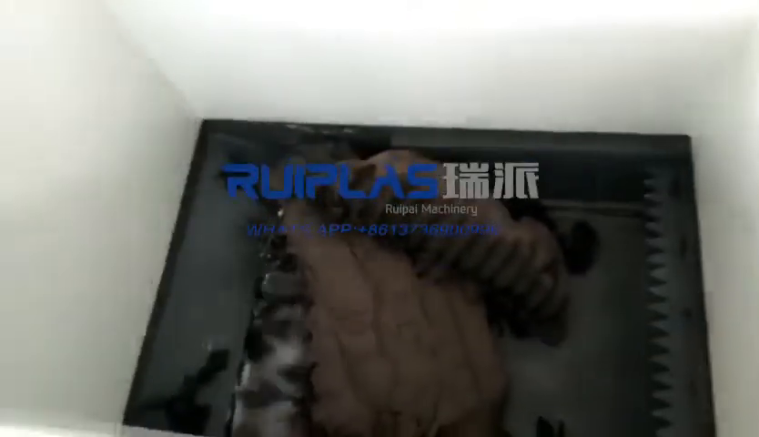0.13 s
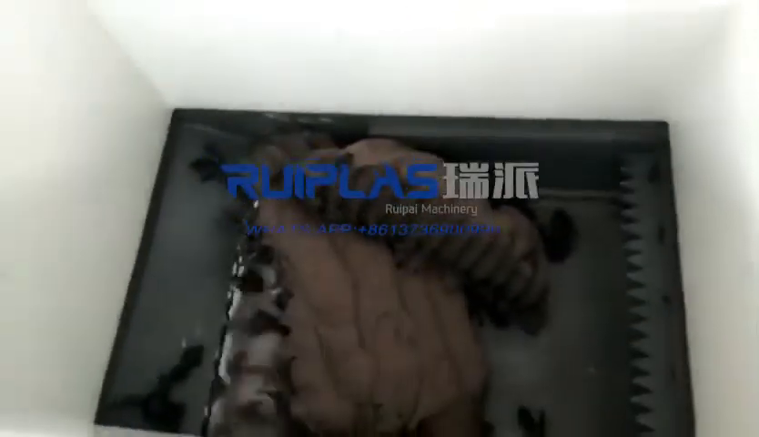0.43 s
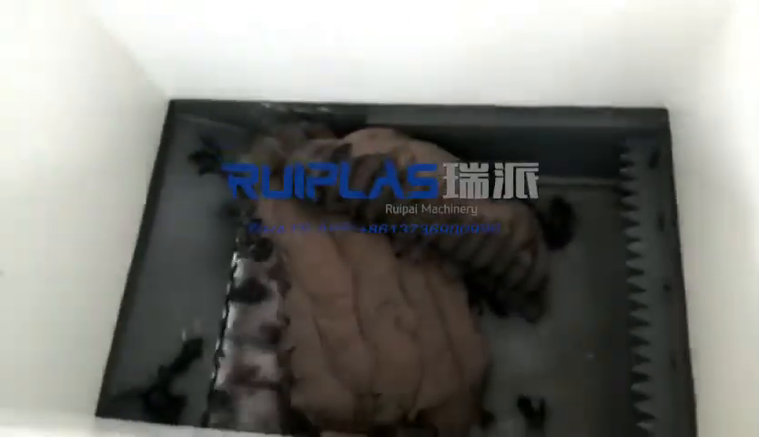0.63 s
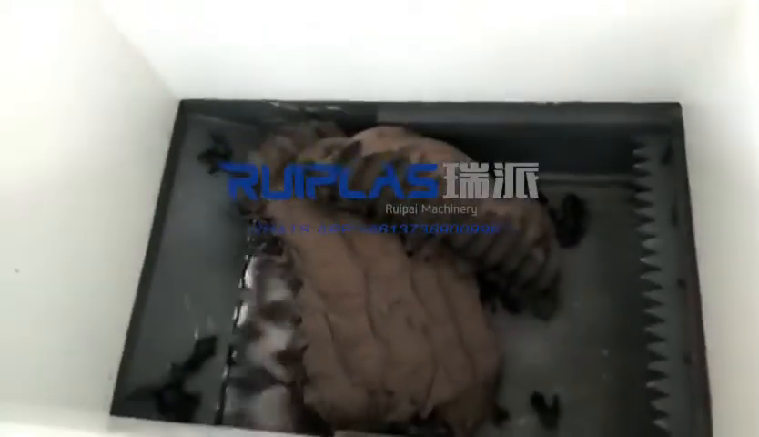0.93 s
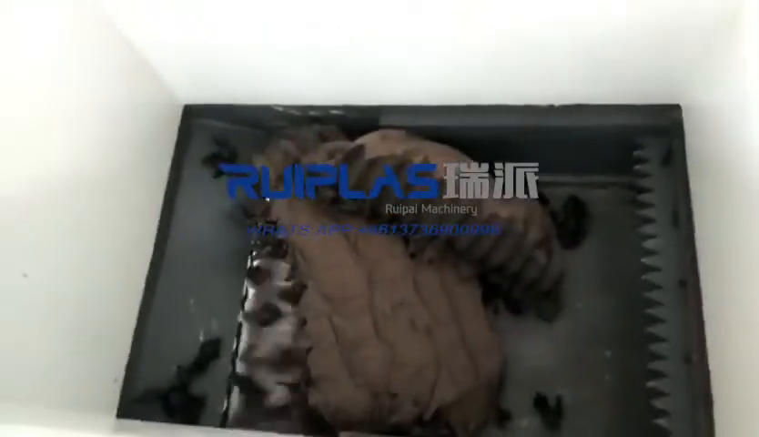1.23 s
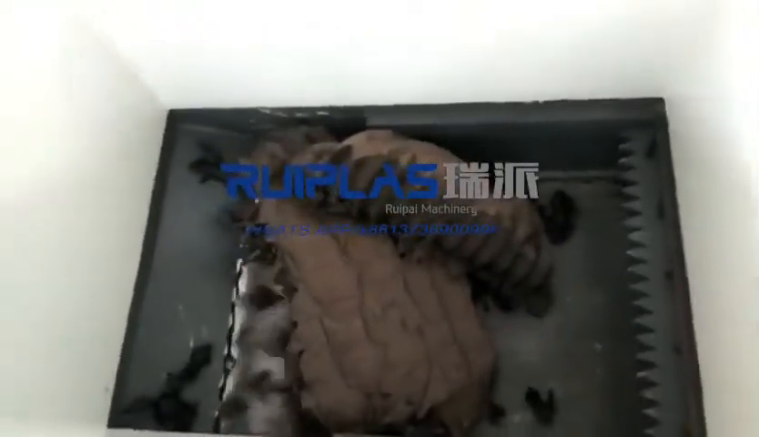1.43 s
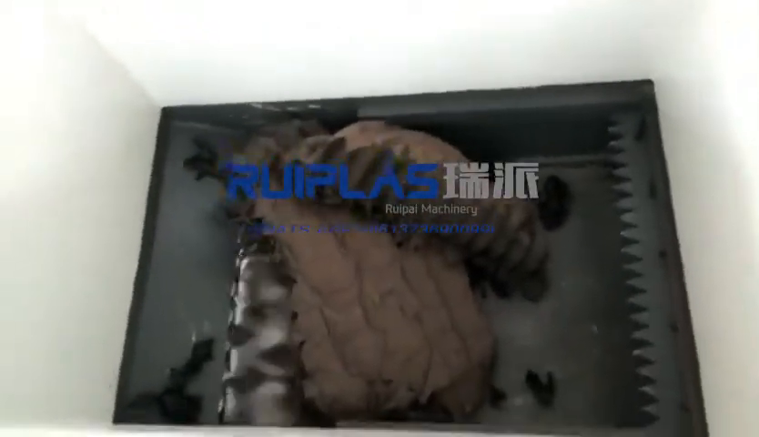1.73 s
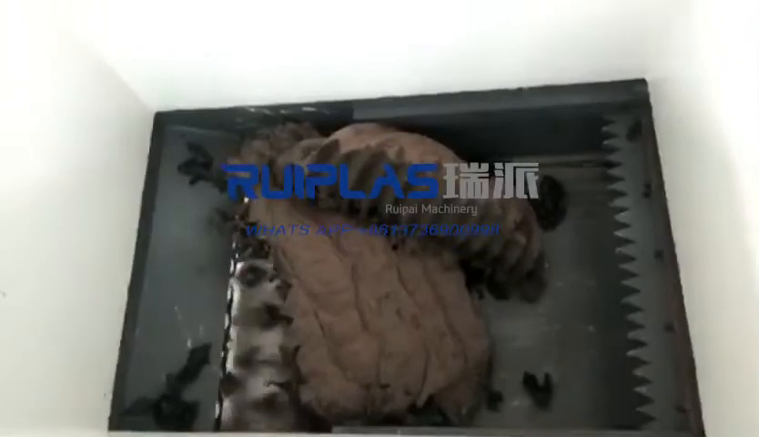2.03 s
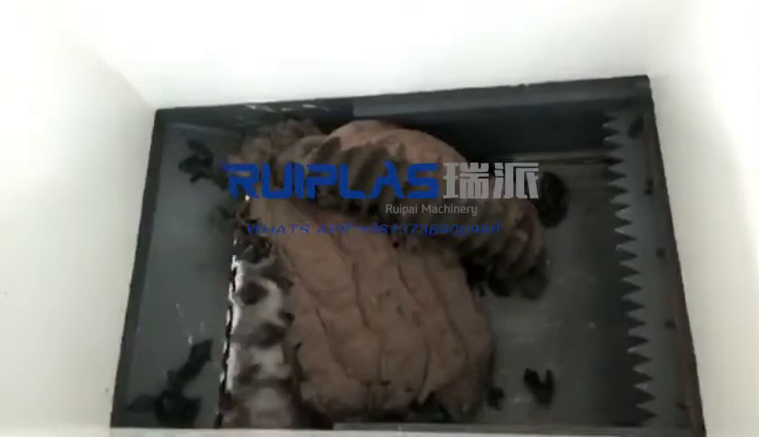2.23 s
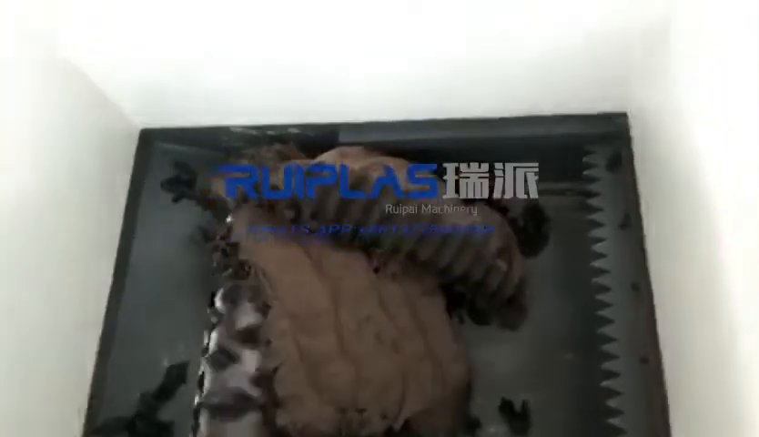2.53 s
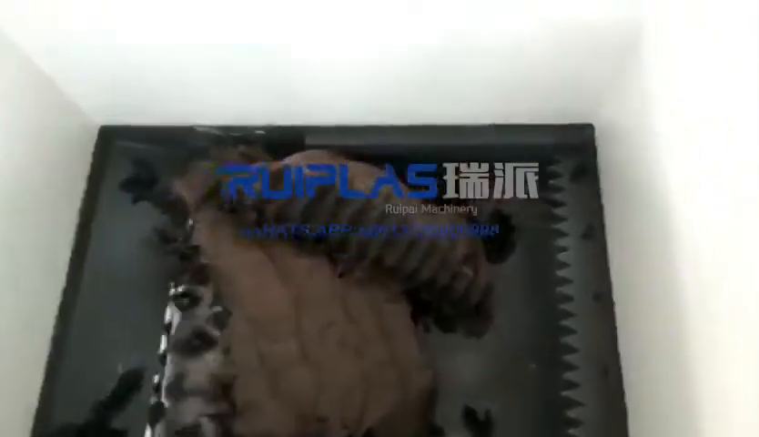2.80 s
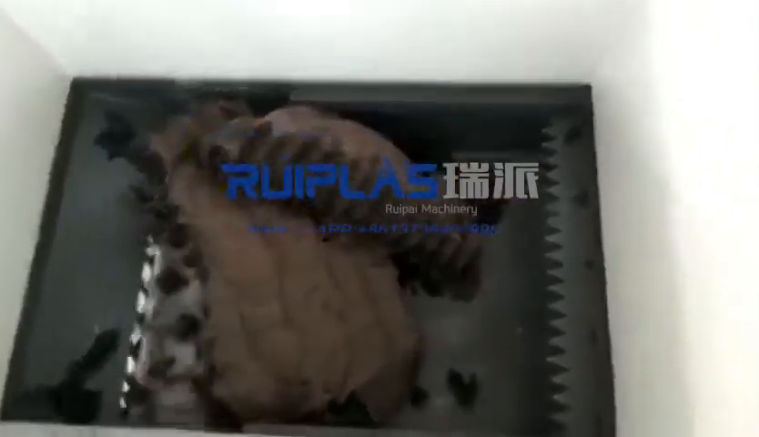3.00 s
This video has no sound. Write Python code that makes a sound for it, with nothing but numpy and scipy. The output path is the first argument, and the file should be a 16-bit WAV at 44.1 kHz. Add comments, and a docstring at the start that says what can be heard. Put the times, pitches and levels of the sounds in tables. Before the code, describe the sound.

An industrial shredder runs throughout, its low drive hum under a dense steel roar; teeth crunch rapidly into a plastic lump that groans, chips snapping and pieces clacking, heard close above the hopper in a hall.

```python
"""A single-shaft shredder chews a big lump of plastic, heard from above its steel hopper.
From the start the drive hums and rumbles, and the teeth bite about thirteen times a second: filtered random
clicks crunch and rasp, and knocks ring the housing. The lump chatters as a wavering low tone and soon creaks
in rough glides. From half a second on, chips snap off as bright noise bursts, then hard pieces clack on the
steel and the lump thumps the frame. The cutting sounds echo in the hall."""
import sys
import numpy as np
from scipy import signal
from scipy.fft import rfft, irfft, next_fast_len
from scipy.io import wavfile
from scipy.ndimage import uniform_filter1d, minimum_filter1d

SR = 44100
rng = np.random.default_rng(int(sys.argv[2]) if len(sys.argv) > 2 else 0)


def dump(signal):
    """Clip the signal to [-1, 1] and save it as 16-bit WAV at the path in sys.argv[1]."""
    limited = np.clip(np.atleast_2d(signal).T, -1, 1)
    pcm = np.round(limited * 32767).astype(np.int16)
    wavfile.write(sys.argv[1], SR, pcm)


N = 139356
T = np.arange(N) / SR

# All levels are relative: the layer gains below and the filters also act on them.
# hums of the drive: [pitch_hz, level_db, unsteadiness 0-1]
DRIVE_HUMS = [(76.5, -31, 0.6), (90.85, -30.5, 0.7), (104, -39, 1), (224, -36, 1), (401.8, -32, 0.92),
              (708, -39, 1)]
# colour of the frame's rumble: [frequency_hz, density_db_per_hz]
RUMBLE_COLOUR = [(25, -3.5), (42, -25.5), (58, -1), (72, 4.5), (92, 1.5), (108, -1.5), (150, -5),
                 (300, -30.5)]
RUMBLE_DB = -28.5

# grinding under the load on the rotor: [start_s, roar_level_db, rasp_level_db]
ROTOR_LOAD = [(0, -20, -15), (.1, -21.5, -21.5), (.5, -18.5, -24), (.65, -24, -20), (.9, -20.5, -25),
              (1.2, -20, -21), (1.44, -22, -23), (1.83, -17, -23.5), (2.2, -19.5, -19.5),
              (2.45, -22, -19.5), (2.7, -17, -22.5), (2.9, -18.5, -17), (3.16, -22, -16.5)]
# a tooth bites: [start_s, crunch_level_db, knock_level_db, length_s]
TOOTH_BITES = [(0.0094, -16, -15.5, 0.045), (0.049, -17.5, -25.5, 0.0063), (0.255, -15, -24.5, 0.029),
               (0.328, -19, -14.5, 0.014), (0.428, -17, -18.5, 0.0079), (0.502, -14, -19.5, 0.013),
               (0.535, -14.5, -30.5, 0.011), (0.654, -18.5, -17, 0.021), (0.682, -17.5, -35, 0.026),
               (0.793, -15.5, -17, 0.037), (0.876, -19.5, -18, 0.078), (0.924, -19.5, -18.5, 0.055),
               (1.105, -14.5, -17, 0.038), (1.191, -18, -10, 0.046), (1.261, -11.5, -9.5, 0.01),
               (1.387, -21, -18, 0.015), (1.456, -21, -9, 0.0071), (1.5395, -10, -17, 0.0087),
               (1.607, -13, -12.5, 0.0074), (1.627, -17, -12.5, 0.032), (1.678, -15.5, -18, 0.025),
               (1.743, -15.5, -29.5, 0.034), (1.841, -17.5, -11, 0.028), (1.9096, -16, -33, 0.032),
               (1.994, -16.5, -15, 0.056), (2.089, -17, -13, 0.019), (2.245, -16, -17, 0.049),
               (2.3114, -12, -13, 0.039), (2.403, -19, -9, 0.014), (2.471, -16, -15, 0.1),
               (2.54, -15, -15, 0.017), (2.602, -11.5, -29, 0.0087), (2.651, -20, -19, 0.016),
               (2.699, -15.5, -15.5, 0.047), (2.789, -9.5, -11.5, 0.017), (2.85, -12.5, -15, 0.028),
               (2.946, -22, -18.5, 0.019), (2.992, -16.5, -8.5, 0.019), (3.037, -17.5, -10, 0.016),
               (3.098, -19, -10.5, 0.0071)]
BITE_ATTACK_S, BITE_RELEASE_S = 0.009, 0.021

# resonances of housing and hopper: [pitch_hz, width_hz, level_db]
HOUSING_MODES = [(216.5, 23, 0), (299.2, 15, 3), (324.4, 14, 1), (372.8, 4.4, -4.5), (403, 3.4, -1.5),
                 (491, 22, -5.5), (625.8, 19.8, 2), (712.6, 17, -1), (806, 42, -2.5), (883, 27, -5),
                 (942, 15, -8), (1234, 28, -1), (1570, 51, -2), (1730, 48, -2.5), (1996, 31, -8.5),
                 (2090, 28, -5.5), (2326, 13, -18), (2577, 60, -12)]
# colour of the grinding's broad roar: [frequency_hz, density_db_per_hz]
ROAR_COLOUR = [(110, -7.5), (155, -0.5), (255, -9), (450, 2.5), (750, -3), (900, -1), (1000, -10)]
HOUSING_DB, ROAR_DB, GRIND_DB, KNOCK_DB = -19, -5.5, 0, -10
IMPACTS_PER_S, IMPACT_SPREAD_DB = 2500, 2.5

# colour of the teeth rasping in the plastic: [frequency_hz, density_db_per_hz]
RASP_COLOUR = [(950, -0.5), (1150, 2.5), (1400, -3), (1700, -2.5), (2150, -2), (2350, -6), (2650, -8.5),
               (3000, -14)]
RASP_DB, RASP_BITE_DB, RASP_PATCHY_DB, RASP_JUDDER_DB = -7.5, -14.5, 2.5, 1.5

# colour of the tearing plastic: [frequency_hz, density_db_per_hz]
CRUNCH_COLOUR = [(1500, 3.5), (2600, -1), (3300, -2.5), (4500, 0), (6000, 1), (7400, -1)]
CRUNCH_DB, SCRAPE_DB, CRUNCH_PATCHY_DB, CRUNCH_FLUTTER_DB = -12, -15.5, 2.5, 2
CRACKS_PER_S_PER_BAND, CRACK_SPREAD_DB = 3000, 2.5

# splinters ring for a moment; larger shreds tap the hopper (rates are totals)
SPLINTERS_PER_S, SPLINTER_WIDTH_HZ, SPLINTER_DB = 470, 27, -17
SHREDS_PER_S, SHRED_WIDTH_HZ, SHRED_DB = 120, 14, -16.5

# strength of the lump's chatter: [start_s, level_db]
GROAN_LEVEL = [(0, -29), (.17, -17), (.22, -32), (.33, -10.5), (.39, -7), (.47, -13.5), (.68, -14.5),
               (.8, -31), (.94, -17), (1.05, -32), (1.14, -17), (1.23, -12), (1.3, -18.5), (1.42, -20),
               (1.7, -27.5), (1.76, -18.5), (1.83, -18.5), (1.99, -20), (2.06, -9.5), (2.1, -22.5),
               (2.2, -13.5), (2.25, -20), (2.33, -18.5), (2.39, -23), (2.5, -28), (2.57, -14),
               (2.635, -26.5), (2.68, -19.5), (2.79, -17), (2.85, -11), (2.93, -27), (2.965, -12),
               (3.01, -10.5), (3.06, -20.5), (3.16, -23)]
# its pitch and how unevenly it slips: [start_s, pitch_hz, roughness 0-1]
GROAN_SLIP = [(0, 349, .2), (.19, 360, 0.42), (.26, 353, 0), (.4, 351.5, 0.25), (.72, 353, 0.42),
              (.9, 356, 0.5), (1.2, 353, 0), (1.28, 360, 0.37), (1.42, 350, 0.8), (1.79, 364, 0.07),
              (1.9, 358, 0.6), (1.99, 346, 0.56), (2.08, 362, 0.46), (2.24, 348, 0.6), (2.4, 360, 0.6),
              (2.6, 361, 0.3), (2.75, 354, 0.6), (2.86, 361, 0.3), (3, 356, 0.3), (3.16, 359, 0.54)]
# overtones of the chatter: [multiple_of_pitch, level_db]
GROAN_OVERTONES = [(2, -22.5), (3, -42.5)]
SLIP_WANDER_HZ, OVERTONE_WANDER_HZ = 25.6, 19

# the lump creaks as it shifts: [start_s, length_s, start_pitch_hz, end_pitch_hz, level_db]
LUMP_CREAKS = [(0.034, 0.13, 700, 467, -23.5), (0.189, 0.18, 599.6, 789, -23.5),
               (1.054, .15, 639.7, 458, -23)]
CREAK_ROUGHNESS, CREAK_WANDER_HZ = 0.88, 97   # roughness 0-1

# a chip snaps off: [start_s, ring_level_db, ring_pitch_hz, crack_level_db]
CHIP_SNAPS = [(0.5598, -27, 6370, -13.5), (0.9621, -20.5, 5940, -12), (1.117, -23, 6940, -16.5),
              (1.919, -23, 6570, -21), (2.274, -11.5, 5880, -14), (2.4827, -18, 8000, -8)]
# colour of the snap's crack: [frequency_hz, density_db_per_hz]
SNAP_COLOUR = [(1500, -4), (2350, 6.5), (2750, 4), (3600, -1), (6000, 6.5), (7400, 2)]
SNAP_ATTACK_S, SNAP_DECAY_S, SNAP_WIDTH_HZ = 0.0023, 0.0049, 510

# a hard piece clacks against the steel: [start_s, level_db, centre_hz]
STEEL_CLACKS = [(0.821, -17.5, 1470), (1.463, -29, 1480), (1.689, -19.5, 1100), (1.855, -16.5, 1150),
                (2.018, -18, 1090), (2.254, -14.5, 1050), (2.647, -16.5, 1400), (2.856, -14, 1600)]
CLACK_DECAY_S, CLACK_WIDTH_HZ, CLACK_TOP_HZ, CLACK_RING_DB = 0.0098, 580, 2904, -6

# the lump drops back and thumps the frame: [start_s, level_db]
FRAME_THUMPS = [(0.934, -15), (1.92, -30), (2.689, -18)]
# colour of the thump: [frequency_hz, density_db_per_hz]
THUMP_COLOUR = [(30, -8.5), (60, -4), (88, 3.5), (125, -14.5), (190, -3), (300, -10)]
THUMP_ATTACK_S, THUMP_DECAY_S = 0.029, 0.1

HALL_T60_S, HALL_DB = 0.32, -7
BED_LOW_PASS_HZ = 7550   # steep low-pass on everything but the snaps, and on the snaps' crack
CUTOFF_HZ = 8600


def from_db(db):
    """Decibels to gain."""
    return 10 ** (np.asarray(db) / 20)


def rms_one(x):
    """Scale to unit power."""
    return x / np.sqrt(np.mean(np.abs(x) ** 2) + 1e-20)


def in_time(rows):
    """Each column of a curve, drawn sample by sample."""
    s, *columns = np.transpose(rows)
    return [np.interp(T, s, c) for c in columns]


def drift(rate_hz):
    """Random wander of unit spread: low-passed noise, drawn at every 40th sample and joined by lines."""
    r = np.exp(-80 * np.pi * rate_hz / SR)
    noise = rng.standard_normal(N // 40 + 2002)
    slow = signal.lfilter([1], [1, -2 * r, r * r], noise)[2000:]   # the filter has settled by here
    return np.interp(np.arange(N) / 40, np.arange(len(slow)), rms_one(slow))


def resonate(x, hz, width_hz):
    """One resonance that keeps the power of white input."""
    r = np.exp(-np.pi * width_hz / SR)
    feed = np.sqrt((1 - r * r) / 2) * np.array([1, 0, -1])
    feedback = [1, -2 * r * np.cos(2 * np.pi * hz / SR), r * r]
    return signal.lfilter(feed, feedback, x + 1e-18)


def colour(x, spectrum):
    """Minimum-phase filter with the given spectrum, falling away past its ends; keeps white power."""
    hz, db = np.transpose(spectrum)
    size = 2 * next_fast_len(N)
    octave = np.log2(np.maximum(np.arange(size // 2 + 1) * SR / size, 1))
    points = np.log2(hz)
    outside = np.abs(octave - np.clip(octave, points[0], points[-1]))
    magnitude = rms_one(from_db(np.interp(octave, points, db) - 18 * outside))   # 18 dB per octave
    # folding the cepstrum forward makes the filter causal
    cepstrum = irfft(np.log(magnitude))
    cepstrum[1:size // 2] *= 2
    cepstrum[size // 2 + 1:] = 0
    return irfft(rfft(x, size) * np.exp(rfft(cepstrum)))[:N]


def low_pass(x, hz):
    """A steep cut of the top."""
    return signal.sosfilt(signal.ellip(10, .3, 70, hz, fs=SR, output="sos"), x + 1e-18)


def clicks(per_s, spread_db):
    """Random clicks of uneven size and either sign, unit power."""
    excess = np.minimum(rng.exponential(1, N), 5)
    sizes = from_db(spread_db * excess) * rng.choice([-1, 1], N)
    return rms_one(sizes * (rng.random(N) < per_s / SR))


def cracks(low_hz, high_hz, per_s, spread_db, patchy_db, rate, count):
    """Random cracks of shifting colour: each band has its own clicks and swells and fades alone."""
    edges, out = np.geomspace(low_hz, high_hz, count + 1), 0
    for band in zip(edges, edges[1:]):
        sos = signal.butter(2, band, "band", fs=SR, output="sos")
        swell = from_db(patchy_db * drift(rate))
        out = out + swell * signal.sosfilt(sos, clicks(per_s, spread_db) + 1e-18)
    return out


def wavering(phase, rough, rate):
    """A tone of unit power, of which a share wanders in strength and phase."""
    rough = np.clip(rough, 0, 1)
    steady = np.sqrt(2 * (1 - rough ** 2)) * np.sin(phase)
    wander = drift(rate) * np.sin(phase) + drift(rate) * np.cos(phase)
    return steady + rough * wander


def drive():
    """The drive's unsteady hums, each wavering on its own, over noise for the rumble of the frame."""
    hum = sum(from_db(db) * wavering(2 * np.pi * hz * T, rough, rate=3.2) for hz, db, rough in DRIVE_HUMS)
    return hum + from_db(RUMBLE_DB) * colour(rng.standard_normal(N), RUMBLE_COLOUR)


def bite_forces():
    """Each bite swells, holds while the tooth cuts, and lets go: strength of crunch and of knock."""
    crunch_power, knock_power = 0, 0
    for s, crunch_db, knock_db, length in TOOTH_BITES:
        rise = (1 + np.tanh(2 * (T - s) / BITE_ATTACK_S)) / 2
        shape = rise * np.exp(-np.maximum(T - s - length, 0) / BITE_RELEASE_S)
        crunch_power = crunch_power + (from_db(crunch_db) * shape) ** 2
        knock_power = knock_power + (from_db(knock_db) * shape) ** 2
    return np.sqrt(crunch_power), np.sqrt(knock_power)


def housing(load, knock):
    """Dense impacts, harder at each bite, set the steel roaring and ringing."""
    force = np.hypot(from_db(GRIND_DB) * load, from_db(KNOCK_DB) * knock)
    roar = colour(force * clicks(IMPACTS_PER_S, IMPACT_SPREAD_DB), ROAR_COLOUR)
    push, rings = rms_one(force), 0
    for hz, width, db in HOUSING_MODES:
        impacts = push * clicks(IMPACTS_PER_S, IMPACT_SPREAD_DB)
        rings = rings + from_db(db) * resonate(impacts, hz, width)
    return from_db(ROAR_DB) * roar + from_db(HOUSING_DB) * rms_one(rings)


def rasp(load, knock):
    """The teeth gouge the plastic: coarse cracks under a juddering force that follows load and knock."""
    judder = rms_one(from_db(RASP_JUDDER_DB * drift(67)))
    force = np.hypot(from_db(RASP_DB) * load, from_db(RASP_BITE_DB) * knock) * judder
    grit = cracks(900, 3416, 700, 3.3, patchy_db=RASP_PATCHY_DB, rate=18, count=8)
    return colour(force * grit, RASP_COLOUR)


def tearing(load, crunch):
    """Tiny cracks of tearing plastic grow louder in each bite, over a scrape that follows the load."""
    flutter = from_db(CRUNCH_DB + CRUNCH_FLUTTER_DB * drift(98))
    force = np.hypot(from_db(SCRAPE_DB) * load, flutter * crunch)
    grit = cracks(1426, 9270, CRACKS_PER_S_PER_BAND, CRACK_SPREAD_DB,
                  patchy_db=CRUNCH_PATCHY_DB, rate=38, count=12)
    return colour(force * grit, CRUNCH_COLOUR)


def splinters(crunch, count):
    """Splinters ping through narrow resonances at random pitches, louder in a hard bite."""
    pings = 0
    for hz in rng.uniform(2300, 7400, count):
        breaks = crunch * clicks(SPLINTERS_PER_S / count, spread_db=3.0)
        pings = pings + resonate(breaks, hz, SPLINTER_WIDTH_HZ)
    return from_db(SPLINTER_DB) * pings / np.sqrt(count)


def shreds(knock, count):
    """Larger shreds tap the hopper, louder with each knock, in brief notes at random pitches."""
    taps = 0
    for hz in rng.uniform(1150, 2400, count):
        hits = knock * clicks(SHREDS_PER_S / count, spread_db=0.5)
        taps = taps + resonate(hits, hz, SHRED_WIDTH_HZ)
    return from_db(SHRED_DB) * taps / np.sqrt(count)


def groan():
    """The lump sticks and slips on the rotor: a gliding tone with overtones, rough where it slips unevenly."""
    (db,), (hz, rough) = in_time(GROAN_LEVEL), in_time(GROAN_SLIP)
    phase = 2 * np.pi * np.cumsum(hz) / SR
    tone = wavering(phase, rough, SLIP_WANDER_HZ)
    for multiple, level_db in GROAN_OVERTONES:
        tone = tone + from_db(level_db) * wavering(multiple * phase, rough, OVERTONE_WANDER_HZ)
    return from_db(db) * tone


def creaks():
    """The lump shifts on the steel with a rough, gliding moan."""
    out = 0
    for s, length, start_hz, end_hz, db in LUMP_CREAKS:
        along = np.clip((T - s) / length, 0, 1)
        phase = 2 * np.pi * np.cumsum(start_hz + (end_hz - start_hz) * along) / SR
        swell = np.sqrt(4 * along * (1 - along))
        out = out + from_db(db) * swell * wavering(phase, CREAK_ROUGHNESS, CREAK_WANDER_HZ)
    return out


def snaps():
    """A chip breaks away: one noise burst feeds a short crack and a bright, narrow ring."""
    out = 0
    for s, ring_db, hz, crack_db in CHIP_SNAPS:
        shape = np.clip((T - s) / SNAP_ATTACK_S, 0, 1) * np.exp(-np.abs(T - s) / SNAP_DECAY_S)
        burst = rng.standard_normal(N) * shape
        edges = [hz - SNAP_WIDTH_HZ / 2, hz + SNAP_WIDTH_HZ / 2]
        band = signal.butter(2, edges, "band", fs=SR, output="sos")
        ring = signal.sosfilt(band, burst + 1e-18) * np.sqrt(SR / 2 / SNAP_WIDTH_HZ)
        crack = low_pass(colour(burst, SNAP_COLOUR), BED_LOW_PASS_HZ)
        out = out + from_db(ring_db) * ring + from_db(crack_db) * crack
    return out


def clacks():
    """A hard piece is knocked against the steel: a short rattle that leaves the housing ringing."""
    rattle, blows = 0, 0
    for s, db, hz in STEEL_CLACKS:
        shape = (T >= s) * np.exp(-np.abs(T - s) / CLACK_DECAY_S)
        blow = from_db(db) * shape * clicks(IMPACTS_PER_S, spread_db=3.0)
        rattle = rattle + resonate(blow, hz, CLACK_WIDTH_HZ)
        blows = blows + blow
    rings = sum(from_db(db) * resonate(blows, hz, width) for hz, width, db in HOUSING_MODES)
    rings = rings / np.sqrt(len(HOUSING_MODES))
    return low_pass(rattle + from_db(CLACK_RING_DB) * rings, CLACK_TOP_HZ)


def thumps():
    """Dull jolts of the whole frame: low noise that swells and dies away."""
    force = 0
    for s, db in FRAME_THUMPS:
        rise = np.clip((T - s) / THUMP_ATTACK_S, 0, 1)
        force = force + from_db(db) * rise * np.exp(-np.abs(T - s) / THUMP_DECAY_S)
    return colour(force * rng.standard_normal(N), THUMP_COLOUR)


def hall(x):
    """The diffuse tail of the factory hall: convolution with decaying noise."""
    tail = rng.standard_normal(N) * from_db(-60 * T / HALL_T60_S)
    return from_db(HALL_DB) * signal.fftconvolve(x, tail / np.linalg.norm(tail))[:N]


def scene():
    """The cutting, with its echo in the hall, over housing, groan and drive; the snaps are laid on top."""
    roar_load, rasp_load = from_db(in_time(ROTOR_LOAD))
    crunch, knock = bite_forces()
    cutting = rasp(rasp_load, knock) + tearing(rasp_load, crunch)
    cutting = cutting + splinters(crunch, count=48) + shreds(knock, count=24) + clacks()
    bed = drive() + housing(roar_load, knock) + groan() + creaks() + thumps()
    bed = bed + cutting + hall(cutting)
    return (low_pass(bed, BED_LOW_PASS_HZ) + snaps())[None]


def record(dry):
    """A limiter ducks the very highest peaks; the top is cut steeply."""
    gain = .88 / np.maximum(np.abs(dry), .88)
    gain = uniform_filter1d(minimum_filter1d(gain, size=221), size=221)   # 5 ms windows
    top_cut = signal.firwin(201, CUTOFF_HZ, window="blackman", fs=SR)
    return signal.fftconvolve(dry * gain, top_cut[None], "same")


dry = scene()
out = record(dry)
dump(out)
```